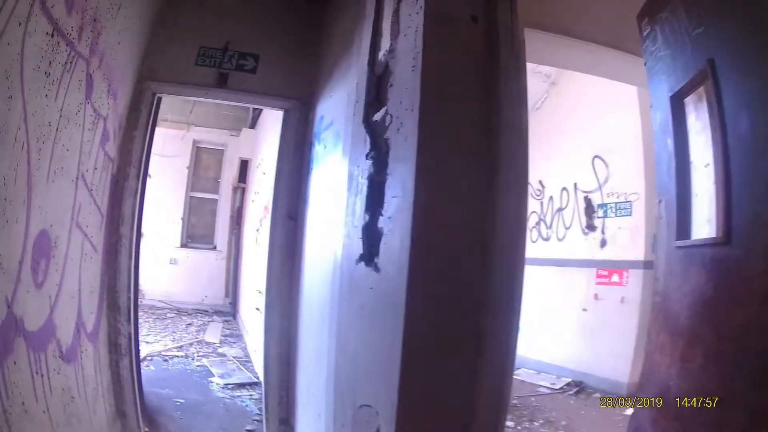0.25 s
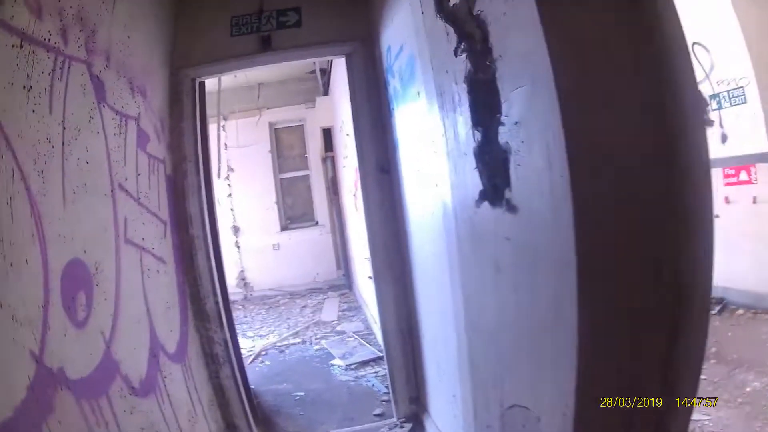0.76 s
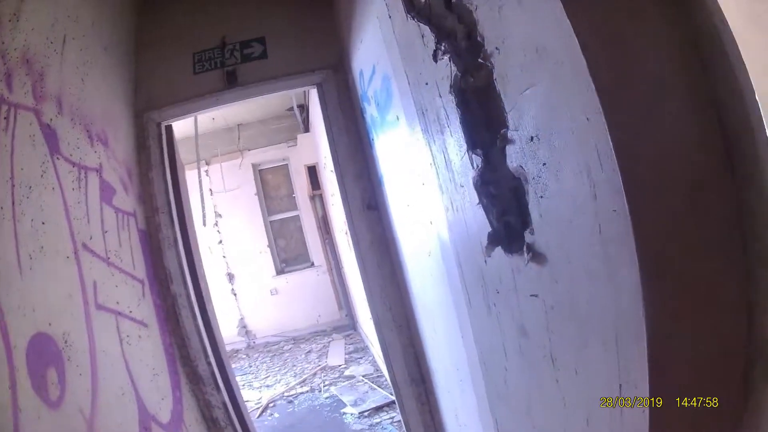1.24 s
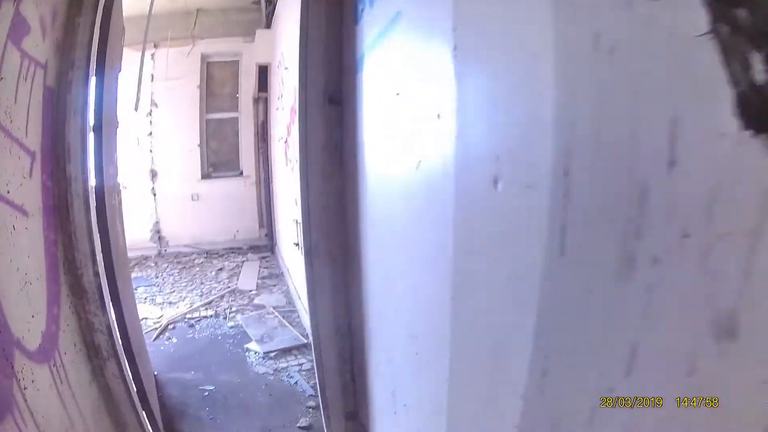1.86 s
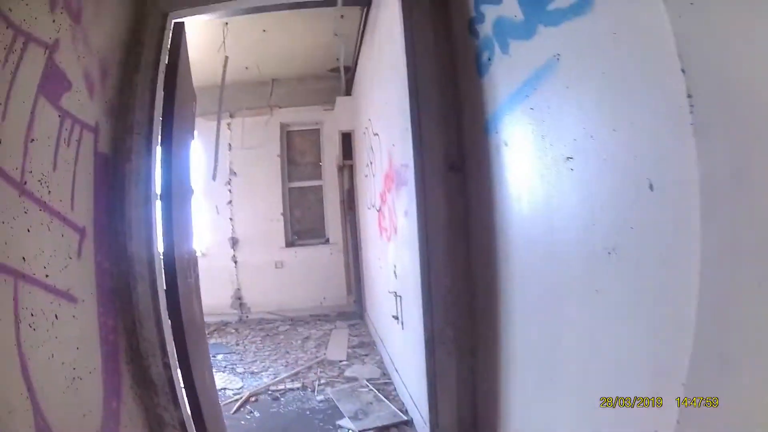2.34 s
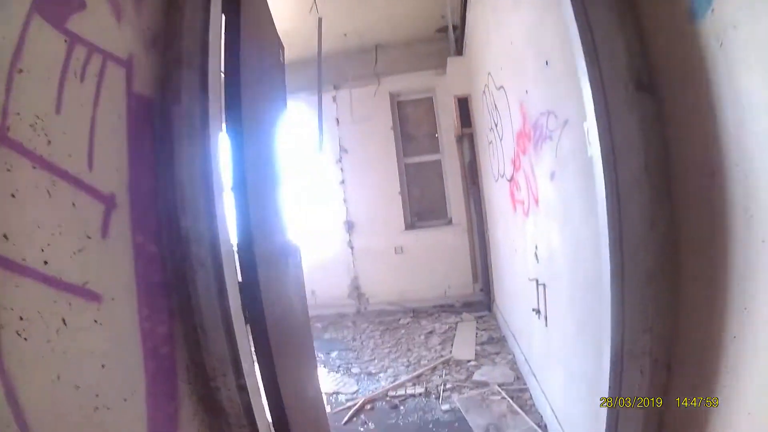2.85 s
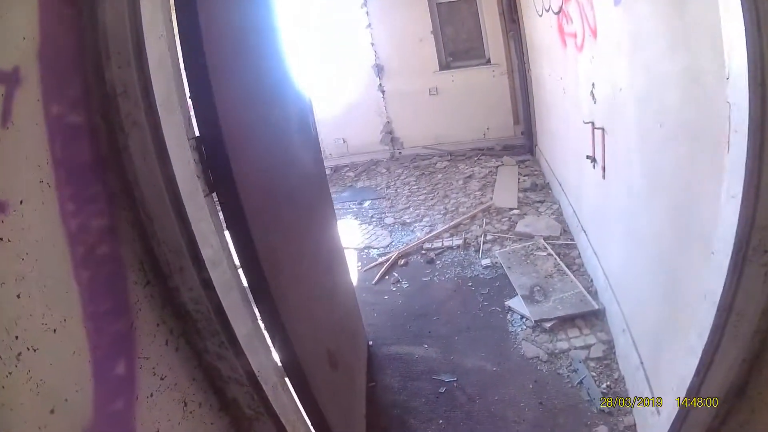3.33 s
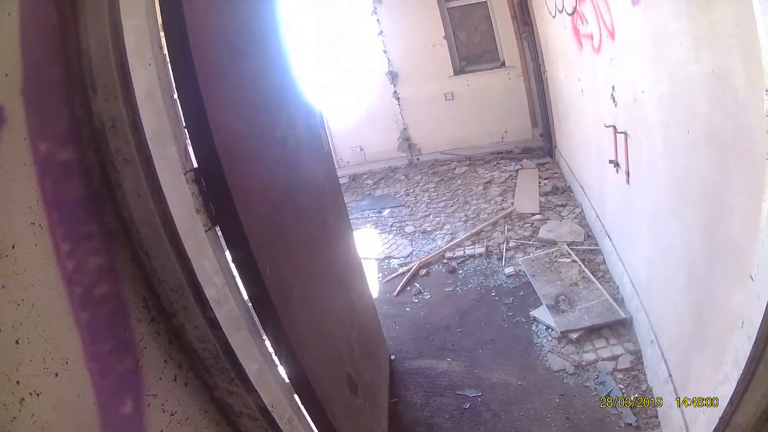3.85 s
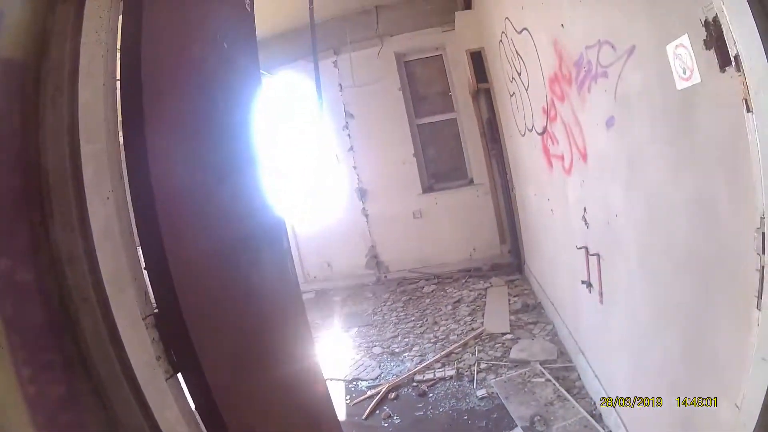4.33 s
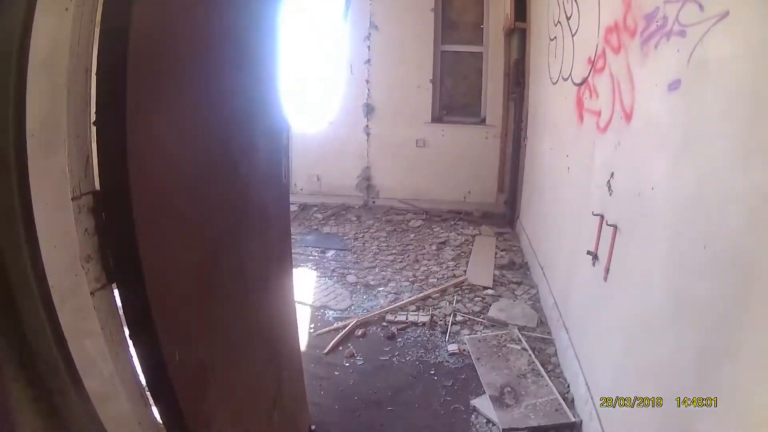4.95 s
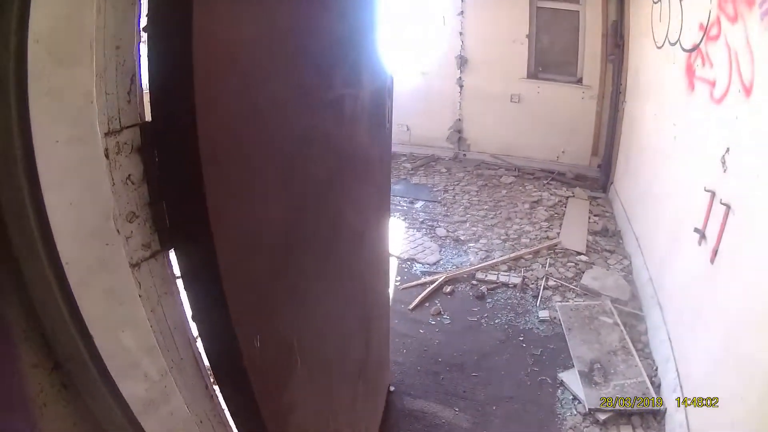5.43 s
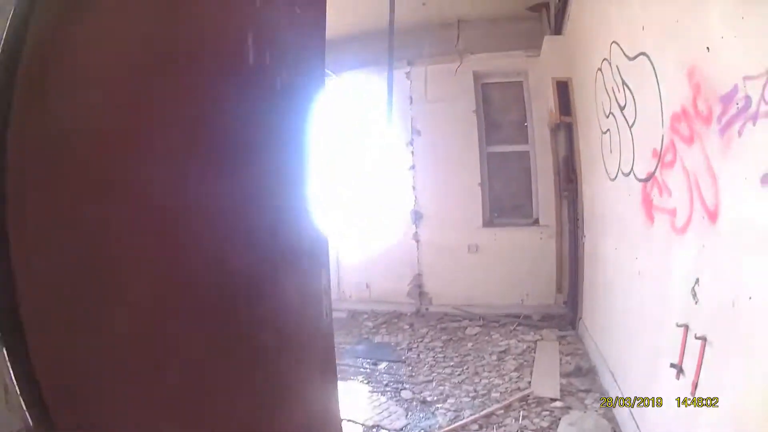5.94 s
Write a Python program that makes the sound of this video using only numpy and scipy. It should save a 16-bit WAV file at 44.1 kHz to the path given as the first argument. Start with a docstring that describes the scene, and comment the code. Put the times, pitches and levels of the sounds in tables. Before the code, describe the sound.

Close, boxy sound from a small camera carried through an abandoned room. A sharp clack opens, then slips of debris knock and rattle in irregular bursts, mixed with low footfalls, scraping grit and cracking shards. The second half is sparse: handling rumble, faint hum, hiss and a thin high whine, occasional crumbs ticking, one isolated knock and snap, then a closing clatter.

```python
"""A dry clack opens over low rumble, hiss, a faint hum and a thin high whine; someone picks their way
over rubble in a bare, derelict room, carrying a small camera in a plastic case.
Each slip sets off catches and rebounds that ring the hollow case (shaped impulse responses and low booms).
Loose chips tick, soles scuff (coloured grains) and thud (bass cycles), and brittle bits snap (spike and ring).
Rumble, stir of the room and hiss are coloured noise; hum is a sine, whine a sign-flipping sine."""
import sys
import numpy as np
from scipy import signal
from scipy.fft import rfft, irfft
from scipy.io import wavfile

SR = 44100
rng = np.random.default_rng(int(sys.argv[2]) if len(sys.argv) > 2 else 0)


def persist_wave(psi):
    """Save psi, clipped to +-1, as 16-bit WAV."""
    counts = np.round(np.clip(psi, -1, 1) * 32767).astype(np.int16)
    wavfile.write(sys.argv[1], SR, np.atleast_2d(counts).T)


N = 272538
TAPS = 4096  # length of one clack, samples
HZ = np.fft.rfftfreq(TAPS, 1 / SR)
T = np.arange(2 * TAPS) / SR
LEAD_S = .004  # silence ahead of the onset in each clack
SETTLED_HZ = 1425  # where the hollow ring sits once a piece is loose

# resonances of the hollow case: centre_hz, width_hz, relative_db
CASE_MODES = [(680, 58, -18), (775, 115, -16.5), (985, 50, -19.5), (1313, 110, -0.8), (1440, 180, -6),
              (1550, 70, -6), (1670, 120, -6), (1900, 110, -17), (2350, 190, -25), (2565, 115, -24),
              (2930, 110, -27), (3840, 110, -30.5), (4230, 150, -31.5), (4670, 260, -33), (5110, 200, -48),
              (6000, 500, -49), (7150, 430, -51)]
# slips of rubble underfoot: start_s, relative_level_db, ring_centre_hz, hardness_db_per_octave (treble),
# weight_db (bass), hollowness_db (modes under 1.1 kHz), crack_db (modes at 1.8-3.3 kHz),
# grind_s (catches fade by 20 dB), first_rebound_db (re the slip)
RUBBLE_SLIPS = [(0.0014, -25.5, 1385, -8, 2, -2, -3, .005, .5),
                (0.1245, -13.5, 1440, -2, 4, -4, -7, .007, -26),
                (0.159, -21.5, 1550, -3, 9, 1, -2, .018, -30),
                (0.187, -18.3, 1560, -8, -1, -2, -3, .005, -17),
                (0.318, -29, 1360, -16, 7, 2, -3, .004, -12),
                (0.3286, -26.5, 1470, -15, 3, -5, -3, .005, -3),
                (0.6612, -33, 1080, -8, 2, -2, -2, .035, -25), (0.8626, -15, 1300, 6, -4, 3, 2, .003, -35),
                (0.8646, -2.5, 1190, 0, 1, 4, 2, .003, -35), (0.8856, -7, 1450, -4, 7, 3, 4, .009, -16),
                (1.2228, -13.5, 1470, 8, -13, 2, 0, .003, -30),
                (1.2261, -6.3, 1260, 7, 4, 5, -1, .006, -35), (1.2325, -10.5, 1350, 3, 6, 5, 3, .011, -35),
                (1.2387, -15.5, 1350, -6, 5, 4, -1, .02, -30),
                (1.2992, -22.5, 1520, -6, 7, 4, -4, .007, -10), (1.4576, -20.5, 1490, 6, 6, 5, 0, .006, -7),
                (1.4846, -9.6, 1370, -5, 10, 2, -4, .008, -30),
                (1.5076, -15, 1450, 0, 6, -1, -2, .005, -15),
                (2.0736, -16.5, 1480, 9, 8, -1, -3, .003, -35),
                (2.0768, -6.7, 1550, 3, 0, -2, -2, .007, -38), (2.1114, -24, 1470, 1, 14, 6, -2, .005, -17),
                (2.1455, -20.5, 1410, -1, 13, 6, -5, .005, -30),
                (2.4072, -8.3, 1420, 6.5, 4, 3, 2, .005, -15), (2.4167, -8, 1560, -7, 1, 3, 3, .006, -30),
                (2.4388, -5.2, 1600, 0.5, 4, 1, -1, .004, -19),
                (2.4565, -20.5, 1460, -5, 11, 1, 4, .01, -17),
                (2.5432, -24.7, 1170, -6, 10, 4, 1, .008, -24),
                (2.6098, -24.5, 1380, -11, 6, -3, -2, .005, -14),
                (2.6378, -25, 1330, -17, -10, -7, -4, .045, -18),
                (2.6907, -11.8, 1480, -2, 4, 2, 8, .006, -13),
                (4.4724, -13, 1350, 6, -14, 2, -4, .003, -35), (5.9346, -16, 1440, 2, -5, 3, -3, .035, -7),
                (5.9534, -21, 1370, -1, 1, 5, -1, .015, -12), (5.9851, -9, 1610, -1, 4, 1, 0, .004, -21),
                (5.9931, -17.5, 1420, -5, 4, 1, -1, .004, -30),
                (6.0121, -14, 1560, -3, -1, -1, -3, .004, -18),
                (6.1078, -13.2, 1460, -7, -1, -1, -6, .021, -18)]


def amp(db):
    """Decibels to gain."""
    return 10 ** (np.asarray(db) / 20)


def evened(x):
    """Scales to rms 1."""
    return x / np.sqrt(np.mean(x ** 2) + 1e-20)


def read(points, hz):
    """Joins (Hz, value) points on a log-frequency axis."""
    f, value = np.transpose(points)
    return np.interp(np.log(hz + 1), np.log(f + 1), value)


def add(mix, s, sound):
    """Mixes a sound in at time s."""
    start = round(s * SR)
    sound = sound[max(-start, 0):]
    part = mix[max(start, 0):][:len(sound)]
    part += sound[:len(part)]


def coloured(x, spectrum):
    """Filters x by a gain curve, then scales to rms 1."""
    gain = amp(read(spectrum, np.fft.rfftfreq(N, 1 / SR)))
    return evened(irfft(rfft(x) * gain, N))


def ring(modes):
    """Sum of exponentially dying sines from rows (Hz, dB, t60 s)."""
    return sum(amp(db) * np.exp(-np.log(1000) * T / t60_s) * np.sin(2 * np.pi * hz * T)
               for hz, db, t60_s in modes)


def background(lumpy_db=5.0, rumble_trim_db=0.3, air_db=-62):
    """Lumpy handling rumble and the faint stir of the room: two coloured noises sharing slow level lumps."""
    # handling of the camera: time_s, rumble_db (before trim and lumps)
    handling = [(0.0, -58), (0.46, -55), (1.26, -58), (1.7, -53), (2.34, -55), (2.84, -50), (3.35, -57),
                (5.5, -54), (6.18, -57)]
    # rumble spectrum: hz, relative_db_per_hz
    rumble_spectrum = [(10, -8), (28, 2), (45, -3.5), (100, -2), (200, -8), (300, -14), (500, -22),
                       (800, -24), (1500, -32), (4000, -81.5)]
    # room stir spectrum: hz, relative_db_per_hz
    air_spectrum = [(300, -4.5), (750, -1.5), (950, -3), (1400, 1.5), (1620, -0.5), (1950, -7),
                    (2500, -9.5), (3300, -11.5), (4000, -14.5), (7000, -25.5)]
    t = np.arange(N) / SR
    knots_s = np.arange(0, t[-1] + .1, .04)
    lumps_db = lumpy_db * np.interp(t, knots_s, 2 * rng.random(len(knots_s)) - 1)
    rumble_db = rumble_trim_db + np.interp(t, *np.transpose(handling)) + lumps_db
    rumble = amp(rumble_db) * coloured(rng.standard_normal(N), rumble_spectrum)
    air = amp(air_db + lumps_db / 2) * coloured(rng.standard_normal(N), air_spectrum)
    return rumble + air


def electronics(whine_db=-70.0, whine_hz=13183.7, flip_hz=40.7, hum_db=-61, hum_hz=59.8, hiss_db=-64.5):
    """Hiss, a low hum and a high whine that keeps flipping its sign, which splits it into close lines."""
    # hiss spectrum: hz, relative_db_per_hz
    hiss_spectrum = [(100, 5.5), (2000, -0.5), (5000, -2.5), (8000, -4), (16000, -5.5)]
    t = np.arange(N) / SR
    flips = np.tanh(25 * np.sin(2 * np.pi * flip_hz * t))
    whine = flips * np.sin(2 * np.pi * whine_hz * t)
    hum = np.sin(2 * np.pi * hum_hz * t)
    tones = np.sqrt(2) * (amp(whine_db) * whine + amp(hum_db) * hum)  # sqrt(2): levels are rms
    return tones + amp(hiss_db) * coloured(rng.standard_normal(N), hiss_spectrum)


def struck(gain, wobble=0):
    """Minimum-phase impulse response with this gain over HZ, delayed by LEAD_S; wobble adds phase."""
    log_gain = np.log(np.maximum(gain, gain.max() * 1e-5))
    circle = np.concatenate([log_gain, log_gain[-2:0:-1]])
    minimum_phase = -signal.hilbert(circle).imag[:len(HZ)]
    phase = minimum_phase + wobble - 2 * np.pi * HZ * LEAD_S
    return irfft(gain * np.exp(1j * phase))


def clack(centre_hz, hard_db, weight_db, hollow_db, crack_db, chance, scatter_db=3.5, focus_hz=380,
          focus_db=7, push_db=-23, push_hz=470, fray=0.32, rise_s=.0016):
    """One ragged slip rings the case; where it bears decides which modes speak most."""
    loudness, catch_sizes, turns = chance
    hz, width_hz, db = np.transpose(CASE_MODES)[:, :, None]
    bearing_db = hollow_db * (hz < 1100) + crack_db * ((hz > 1800) & (hz < 3300))
    db = db + scatter_db * np.tanh(loudness)[:, None] + bearing_db
    mode_power = amp(db) ** 2 / (1 + ((HZ - hz) / width_hz) ** 2 * 2) ** 2
    modes = mode_power.sum(0) ** .5
    # near the main ring, modes away from centre_hz are held down
    near_ring = np.exp(-((HZ - 1450) / 420) ** 4)
    tilt_db = focus_db * near_ring * (np.exp(-((HZ - centre_hz) / focus_hz) ** 2 * 2) - 1)
    tilt_db += hard_db * np.clip(np.log2((HZ + 1) / 1800), 0, 1.2)
    push = amp(push_db + weight_db) / (1 + (HZ / push_hz) ** 4)
    # a burst of tiny catches within a millisecond or two frays the treble most
    lags_s = np.linspace(.0002, .0013, len(CASE_MODES))[:, None]
    ripples = catch_sizes[:, None] * np.sin(2 * np.pi * (HZ * lags_s + turns[:, None]))
    wobble = fray * ripples.sum(0) * np.minimum((HZ / 2500) ** 2, 2)
    # the hollow ring takes a few cycles to build
    swell = -2 * np.arctan((HZ - centre_hz) / 280)
    sound = struck(np.hypot(modes * amp(tilt_db), push), wobble + swell)
    age_s = T[:TAPS] - LEAD_S
    sound *= np.clip(age_s / rise_s + .5, 0, 1)
    sound *= np.exp(-(age_s / .03) ** 2)  # the hand damps the case
    return sound / np.linalg.norm(sound)


def tick(s, db, hz):
    """A loose chip as a knock: (s, dB, ring Hz, hardness dB/octave, weight dB, hollowness dB, crack dB)."""
    return s, db, hz, -7, 3, 0, 0


def strays(per_s=3, level_db=-49, spread_db=3, spread_hz=130, count=40):
    """Crumbs tick by themselves at random moments, as knocks."""
    waits = rng.exponential(1, count)
    sizes, pitches = rng.uniform(-1, 1, (2, count))
    return [tick(s, level_db + spread_db * size, SETTLED_HZ + spread_hz * pitch)
            for s, size, pitch in zip(np.cumsum(waits) / per_s, sizes, pitches)]


def catches(knock, grind_s, jitter, catch_s=.0048, jitter_s=.0002):
    """A grinding piece catches again and again, fading: duller, heavier knocks than the slip."""
    s, db, hz, hard_db, weight_db, *bearing = knock
    fade_db = 20 * catch_s / max(grind_s, 1e-4)
    return [(s + k * catch_s + jitter_s * late, db - k * fade_db, (hz + SETTLED_HZ) / 2,
             hard_db - 5, weight_db + 7, *bearing) for k, late in enumerate(jitter, 1)]


def rocking(slip, rebound_db, rebound_s=.0222, second_db=-17):
    """The slip, then the piece rocks back twice, the second time much more weakly; as knocks."""
    s, db, *_ = slip
    loose = (SETTLED_HZ, -6, 7.5, 0, 0)  # ring Hz, hardness, weight, hollowness, crack
    first = (s + rebound_s, db + rebound_db, *loose)
    second = (s + 2 * rebound_s, db + rebound_db + second_db, *loose)
    return [slip, first, second]


def clacks(level_db=15, body_db=-6, shift_s=-0.00014, body_scatter_db=2, count=4, tick_grind_s=.007):
    """Every knock gives a hollow clack, never twice the same; whole blows also set the case booming."""
    # light ticks of loose chips, which do not rock: start_s, relative_level_db, ring_centre_hz
    chip_ticks = [(.1057, -35, 1450), (.1414, -29, 1400), (.4525, -39, 1500), (.964, -30, 1480),
                  (1.5902, -30, 1440), (1.7908, -36, 1360), (1.957, -35, 1280), (2.583, -29, 1420),
                  (2.8973, -38, 1550), (2.9612, -38, 1220), (2.9721, -36, 1270), (3.1128, -37, 1420),
                  (3.1994, -35.5, 1300), (4.0923, -33.5, 1200), (4.5057, -37, 1380), (4.5585, -37, 1380),
                  (4.5662, -35, 1390), (5.2396, -34.5, 1600), (5.731, -36, 1450), (5.9688, -24, 1460),
                  (6.0286, -28, 1390), (6.0521, -32, 1560), (6.099, -35, 1400), (6.1454, -30, 1400)]
    # low knock of the case as a whole: hz, relative_db, t60_s
    body_modes = [(494, -32, 0.19), (695, -31, 0.14), (290, -24.5, 0.05), (170, -28, .05),
                  (116, -22, 0.038)]
    out = np.zeros(N)
    blows, chatter = strays(), []
    slip_jitter = rng.standard_normal((len(RUBBLE_SLIPS), count))
    for (*slip, grind_s, rebound_db), jitter in zip(RUBBLE_SLIPS, slip_jitter):
        blows += rocking(slip, rebound_db)
        chatter += catches(slip, grind_s, jitter)
    for row, jitter in zip(chip_ticks, rng.standard_normal((len(chip_ticks), count))):
        blows.append(tick(*row))
        chatter += catches(tick(*row), tick_grind_s, jitter)
    knocks = blows + chatter
    chance = rng.standard_normal((len(knocks), 4, len(CASE_MODES)))
    for (s, db, *colour), luck in zip(knocks, chance):
        if db > -50 and s < N / SR:  # skip the faintest
            add(out, s + shift_s - LEAD_S, amp(db + level_db) * clack(*colour, luck[1:]))
    build = 1 - np.exp(-T / .002)
    booms = np.array([ring([mode]) * build for mode in body_modes])
    for (s, db, _, _, weight_db, *_), luck in zip(blows, chance):
        polarity = np.sign(luck[0, -len(body_modes):])
        pushes = amp(body_scatter_db * luck[0, :len(body_modes)]) * polarity
        add(out, s, amp(db + body_db + weight_db / 2) * (pushes @ booms))
    return out


def room(x, build_s=0.0027):
    """A faint diffuse tail: unit-energy noise, each band dying at its own speed."""
    # decay of the room: hz, t60_s
    room_decay = [(300, 0.72), (1400, 0.25), (6000, 0.15)]
    hz, t, z = signal.stft(rng.standard_normal(SR // 2), SR, nperseg=256)
    t60_s = read(room_decay, hz)[:, None]
    fall = np.exp(-np.log(1000) * t / t60_s) * (1 - np.exp(-t / build_s))
    tail = signal.istft(z * fall, SR, nperseg=256)[1]
    return signal.fftconvolve(x, tail / np.linalg.norm(tail))[:N]


def grit(per_s, spread_db):
    """Sparse tiny slips of unequal size and random sign, at rms 1."""
    size = amp(spread_db * rng.random(N))
    return evened(size * rng.choice([-1, 1], N) * (rng.random(N) < per_s / SR))


def scuffs(grit_level_db=-56, follow=.3, lag_s=.02, grit_sigma_s=.014, fine_db=-16):
    """A sole drags, or a slip loosens grit: coarse grains sound through the case, fine ones rustle."""
    # scuffs of a sole on grit: middle_s, sigma_s, scrape_db, rustle_db
    sole_scuffs = [(.575, 0.035, -56, -58), (1.793, .035, -56, -59), (1.948, 0.024, -54, -58),
                   (2.615, 0.04, -53, -68), (2.98, 0.045, -55, -66), (3.2, 0.1, -63, -76),
                   (3.467, 0.063, -65, -64), (4.853, 0.077, -66.5, -63)]
    # hollow scrape spectrum: hz, relative_db_per_hz
    scrape_spectrum = [(200, -50), (550, -2.5), (750, 3), (950, -10.5), (1150, 10), (1400, 8), (1620, 8),
                       (1900, -26.5), (2600, -19), (6000, -58.5)]
    # gritty rustle spectrum: hz, relative_db_per_hz
    rustle_spectrum = [(800, -3.5), (2000, 1), (2400, 1.5), (3000, -8), (3800, -12.5), (5000, -15),
                       (7000, -18), (12000, -24)]
    t = np.arange(N) / SR
    strokes = list(sole_scuffs)
    for s, db, *_ in RUBBLE_SLIPS:
        grit_db = grit_level_db + follow * (db + 20)
        strokes.append((s + lag_s, grit_sigma_s, grit_db, grit_db + fine_db))
    scrape, rustle = np.zeros((2, N))
    for s, sigma_s, scrape_db, rustle_db in strokes:
        near = abs(t - s) < 5 * sigma_s
        stroke = np.exp(-((t[near] - s) / sigma_s) ** 2 / 2)
        scrape[near] += amp(scrape_db) * stroke
        rustle[near] += amp(rustle_db) * stroke
    coarse = coloured(grit(per_s=170, spread_db=20), scrape_spectrum)
    fine = coloured(grit(per_s=2200, spread_db=14), rustle_spectrum)
    return scrape * coarse + rustle * fine


def thuds(cycles=0.46):
    """Weight comes down on a sole: a cycle or two of bass."""
    # soft thuds of the soles: start_s, envelope_peak_db, pitch_hz
    sole_thuds = [(0.513, -39, 65), (0.775, -40, 102), (1.235, -31, 125), (1.926, -35.5, 88.6),
                  (2.077, -23.5, 205), (2.997, -34, 72), (3.333, -39, 179), (5.253, -41, 220)]
    out = np.zeros(N)
    for s, db, hz in sole_thuds:
        u = T * hz / cycles  # envelope peaks at u = 1
        add(out, s, amp(db) * u * np.exp(1 - u) * np.sin(2 * np.pi * hz * T))
    return out


def snaps():
    """A shard gives way: one sharp low-passed spike with a short bright ring."""
    # brittle snaps: start_s, peak_db, treble_edge_hz, ring_db (re the spike)
    shard_snaps = [(.5136, -21.5, 2300, -9), (1.8298, -23.5, 7000, 2), (1.8369, -34, 5000, 4),
                   (2.769, -28, 6800, 4), (2.8084, -28.5, 1330, -49), (4.9861, -24.5, 7500, 3.5),
                   (4.9936, -34.5, 5000, 1), (5.9246, -29.5, 1300, -14), (6.1277, -30, 6100, 5)]
    # what a snap rings with: hz, relative_db, t60_s
    shard_modes = [(1425, -14.5, 0.02), (3810, -12, .013), (4000, -22, 0.0061), (5420, -22, 0.0056),
                   (6900, -26, 0.0067)]
    out = np.zeros(N)
    for s, db, edge_hz, ring_db in shard_snaps:
        spike = amp(ring_db) * ring(shard_modes) - np.exp(-T / 0.00016)
        sound = signal.lfilter(*signal.butter(2, edge_hz, fs=SR), spike)
        add(out, s, amp(db) * sound / abs(sound).max())
    return out


def scene(room_db=-25):
    """Clacks and snaps in the room, over thuds, scuffing and background."""
    hits = clacks() + snaps()
    return (hits + amp(room_db) * room(hits) + thuds() + scuffs() + background())[None]


def record(dry, ceiling=.9, edge_hz=15950):
    """The camera adds its own noise, rounds off the highest peaks, then limits the band."""
    low_pass = signal.firwin(511, edge_hz, window=("kaiser", 9), fs=SR)
    rounded = ceiling * np.tanh((dry + electronics()) / ceiling)
    return signal.oaconvolve(rounded, low_pass[None], "same")


dry = scene()
out = record(dry)
persist_wave(out)
```